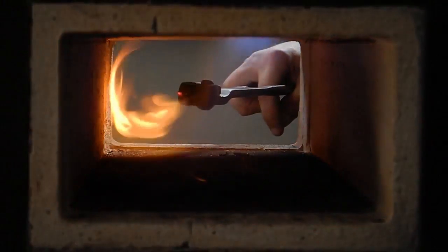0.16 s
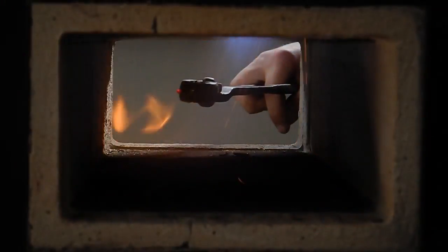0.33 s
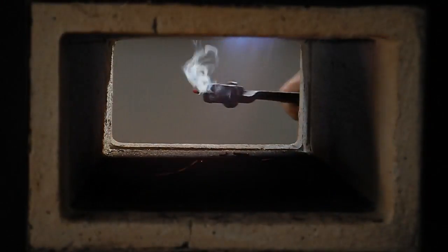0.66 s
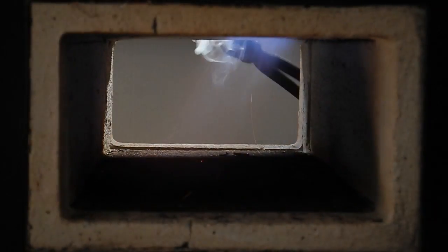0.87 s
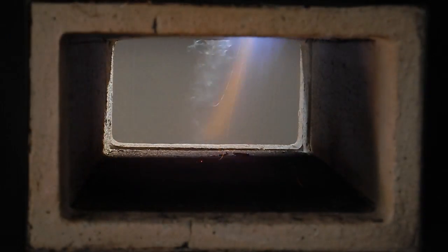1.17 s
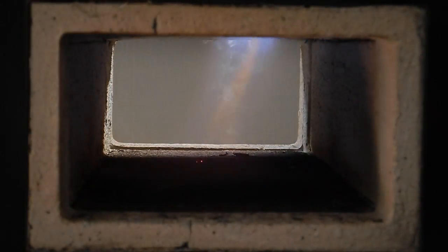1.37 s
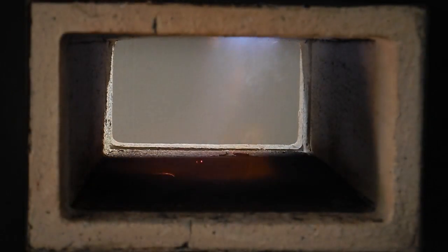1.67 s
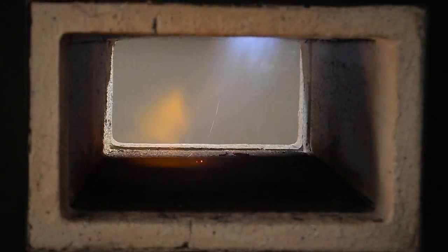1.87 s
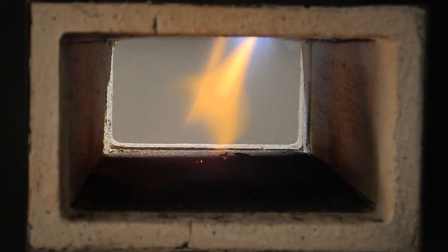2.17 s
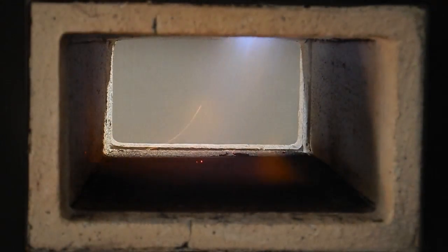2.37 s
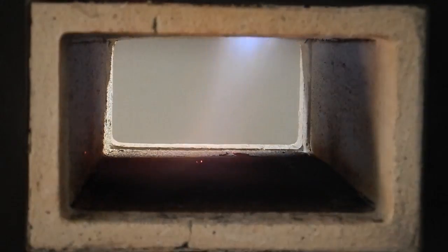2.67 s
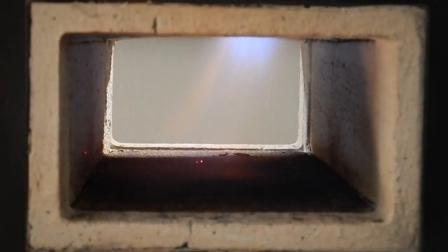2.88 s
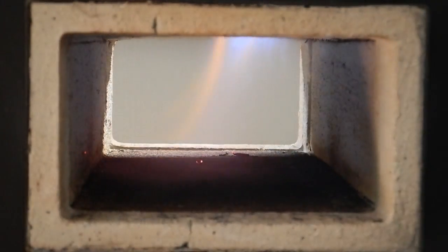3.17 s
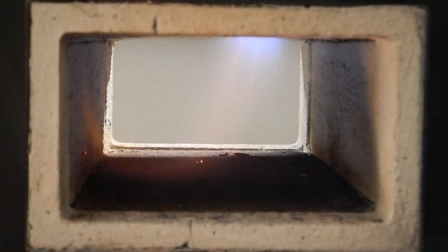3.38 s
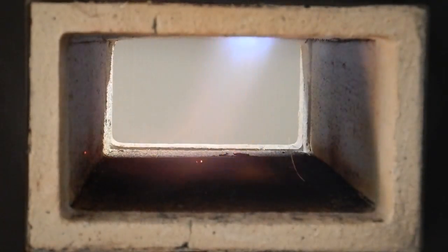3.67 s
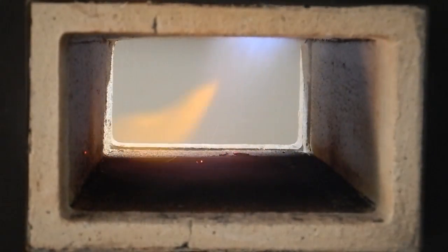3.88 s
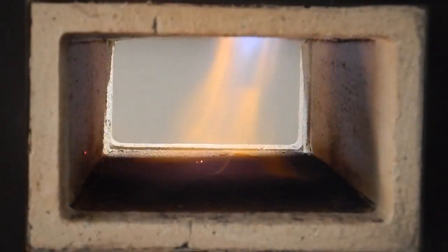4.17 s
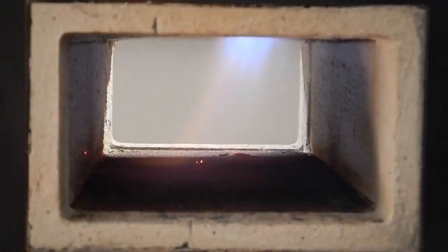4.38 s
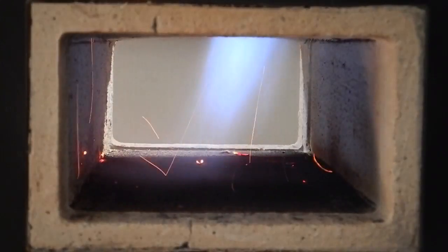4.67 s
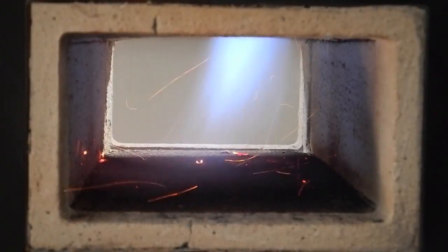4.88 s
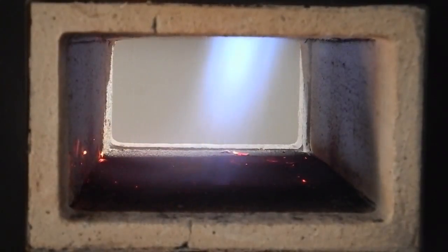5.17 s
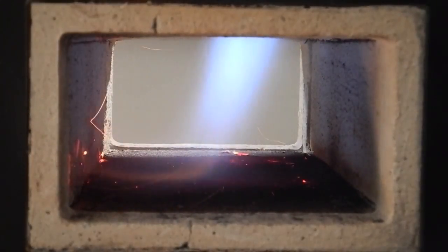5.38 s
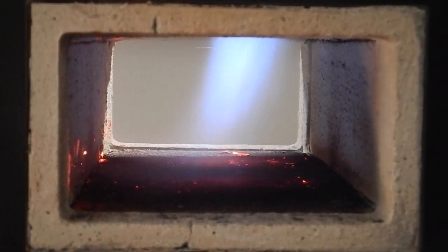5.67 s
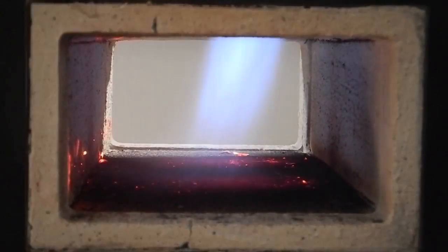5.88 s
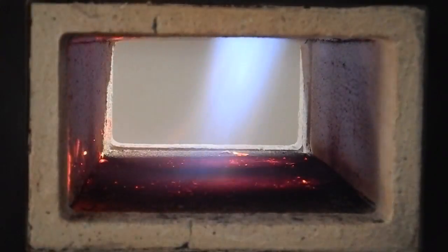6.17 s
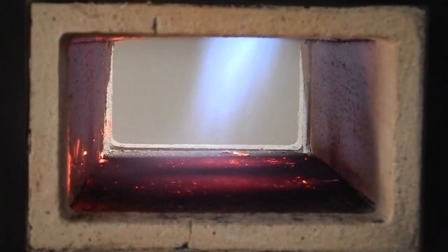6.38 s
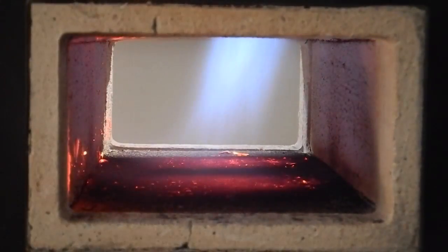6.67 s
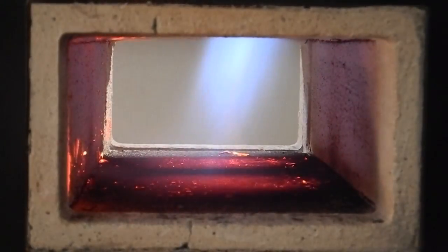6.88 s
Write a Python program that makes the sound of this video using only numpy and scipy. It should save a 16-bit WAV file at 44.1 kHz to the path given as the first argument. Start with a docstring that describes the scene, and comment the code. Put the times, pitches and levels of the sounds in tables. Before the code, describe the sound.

Close stereo pickup at the mouth of a little forge. First a rough, throaty gas roar, swelling in irregular soft thumps and dipping for moments, with a hollow chamber hum inside. Around four seconds it flips sharply into a loud, smooth, piercing hiss with a coloured, tube-like ring, slightly fluttering, its pitch creeping up almost unnoticeably. The room is very quiet beneath.

```python
"""A gas burner fires down into a small open brick forge, heard from the front opening.
First a lumpy low roar: bands of chamber-coloured noise, swelling in whumps and dipping in gutters.
At about 4 s it turns within milliseconds to a bright jet hiss, noise shaped by the resonances and
cancellations of burner tube and chamber, its pitches creeping up, over a faint workshop floor."""
import sys
import numpy as np
from scipy import signal
from scipy.fft import rfft, irfft, next_fast_len
from scipy.io import wavfile
from scipy.ndimage import uniform_filter1d, map_coordinates

SR = 44100
rng = np.random.default_rng(int(sys.argv[2]) if len(sys.argv) > 2 else 0)


def unload_wav(signal):
    """Save mono or channel-first audio to the path in sys.argv[1] as 16-bit WAV at rate SR, clipped to [-1, 1]."""
    wavfile.write(
        sys.argv[1],
        SR,
        np.round(np.clip(np.atleast_2d(signal).T, -1, 1) * 32767).astype(np.int16),
    )


N = 310023
SIZE = next_fast_len(N)
TIME_S = np.arange(N) / SR
HZ = np.maximum(np.arange(SIZE // 2 + 1) * SR / SIZE, 1)
SWITCH_S = 4.038   # middle of the change from roar to jet


def from_db(db):
    """Decibels to gain."""
    return 10 ** (np.asarray(db) / 20)


def rms_one(x):
    """Scaled to rms 1."""
    return x / np.sqrt(np.mean(x ** 2) + 1e-20)


def in_time(points):
    """A (seconds, value) table as a curve over all samples."""
    at_s, values = np.transpose(points)
    return np.interp(TIME_S, at_s, values)


def at_hz(points):
    """A (Hz, value) table read at every spectral bin, on a log axis."""
    point_hz, values = np.transpose(points)
    return np.interp(np.log(HZ), np.log(point_hz), values)


def bells(events, half_s):
    """Sum of bell-shaped bumps, each event a (seconds, height in dB)."""
    return sum(db * np.exp(-((TIME_S - at_s) / half_s) ** 2) for at_s, db in events)


def drift(corner_hz):
    """Noise at every 20th sample through a double one-pole low-pass, run in; rms 1."""
    step = 20
    pole = np.exp(-2 * np.pi * corner_hz * step / SR)
    raw = rng.standard_normal(N // step + 4002)
    slow = signal.lfilter([1], [1, -2 * pole, pole * pole], raw)[4000:]
    return np.interp(np.arange(N) / step, np.arange(len(slow)), rms_one(slow))


def bell_hz(hz, width_hz):
    """Resonance curve of height 1."""
    return 1 / (1 + (2 * (HZ - hz) / width_hz) ** 2)


def colour(tilt, tilt_db, modes, notches):
    """Gain per bin: resonances add their power to a smooth slope, notches cut into the sum."""
    power = from_db(2 * (at_hz(tilt) + tilt_db))
    for hz, width_hz, db in modes:
        power = power + from_db(2 * db) * bell_hz(hz, width_hz) ** 2
    cut_db = sum(db * bell_hz(hz, width_hz) for hz, width_hz, db in notches)
    return np.sqrt(power) * from_db(cut_db)


def stereo_noise(gain, likeness, balance):
    """Spectra of two partly alike channels of coloured noise."""
    mid, side = rfft(rng.standard_normal((2, SIZE)))
    alike = np.clip(at_hz(likeness), 0, 1)
    lean = from_db(at_hz(balance) / 2)
    mid, side = np.sqrt(1 + alike) * mid, np.sqrt(1 - alike) * side
    return gain * np.array([(mid + side) * lean, (mid - side) / lean])


def band(spectra, edges_hz, flicker_db):
    """The sound between the outer edges, in parts that each follow their own flicker; rms 1."""
    below = [1 / (1 + (HZ / hz) ** 12) for hz in edges_hz]
    total = 0
    for low, high in zip(below, below[1:]):
        part = irfft(spectra * (high - low), SIZE)[:, :N]
        total = total + part * from_db(flicker_db())
    return rms_one(total)


def steadied(x):
    """Slow chance swings of the level are partly taken out; rms 1."""
    span_s, share = 0.038, 0.61
    size = int(span_s * SR)
    power = np.mean(x ** 2, axis=0)
    for _ in range(2):
        power = uniform_filter1d(power, size=size)
    return rms_one(x / (power + 1e-9) ** (share / 2))


def roar_noise():
    """Turbulent noise coloured by the chamber's resonances, less alike left and right in the treble."""
    # Each row: frequency in Hz, slope between the resonances in relative dB before the offset.
    tilt = [(15, -69), (25, -38), (107, -26), (157, -8.5), (260, -25), (414, -5), (461, -8.5), (749, -26),
            (2590, -32.5), (4300, -39.5), (5300, -45), (7000, -44), (12000, -46.5), (13500, -49.5),
            (15800, -56.5)]
    # Chamber resonances. Each row: frequency in Hz, width in Hz, relative level in dB.
    modes = [(71, 14, -15.5), (112.6, 22.7, -7.5), (152.3, 22, -7.5), (211.4, 19, -12.5),
             (274, 11.4, -14.5), (353, 62, -6), (422.7, 19, -2), (530, 56, -15.5), (642, 15, -23),
             (1106, 150, -32.5), (1690, 79, -27), (2115, 370, -29.5), (2566, 165, -30.5), (3073, 220, -33),
             (3500, 300, -35.5), (3980, 350, -40), (4400, 370, -45.5), (6000, 850, -46.5), (8400, 600, -49),
             (9300, 2000, -46.5)]
    # Narrow gap in the airy top. Each row: frequency in Hz, width in Hz, gain in dB.
    notches = [(8820, 60, -13)]
    # Each row: frequency in Hz, left-right likeness (0 to 1).
    likeness = [(40, .9), (60, 1), (290, 0.98), (640, 0.94), (1200, 0.88), (3400, 0.92), (5000, 0.67),
                (6200, 0.55), (7300, 0.4), (9500, 0.53), (11500, 0.38), (15500, 0.34)]
    # Each row: frequency in Hz, left minus right in dB.
    balance = [(60, -0.9), (550, -2), (1850, -5), (3000, -2.5), (3900, -5), (6000, -3.6), (6700, -2),
               (8400, -0.5), (9300, -2.5), (15000, -1.5)]
    return stereo_noise(colour(tilt, -2.0, modes, notches), likeness, balance)


def roar():
    """Uneven burning: turbulent noise whose puffs shake boom, rumble, fizz and air partly together."""
    # Vigour of the flame, as its fizz before the dips. Each row: time in seconds, level in dB.
    vigour = [(0.0, -40.5), (0.08, -37.5), (0.12, -41), (0.35, -36.5), (0.53, -37.5), (0.55, -36),
              (0.56, -39), (0.64, -36.5), (0.74, -39), (0.77, -36), (0.85, -40.5), (0.95, -37),
              (1.01, -40.5), (1.35, -37), (1.38, -34), (1.4, -38.5), (1.51, -37.5), (1.59, -40.5),
              (1.68, -37.5), (1.69, -37.5), (1.96, -35.5), (2.02, -38.5), (2.52, -36), (2.54, -40),
              (2.66, -36.5), (2.74, -37), (2.76, -40.5), (3.0, -36), (3.03, -38), (3.14, -36.5), (3.2, -41),
              (3.3, -36.5), (3.33, -41), (3.6, -39), (3.65, -40), (3.73, -36.5), (3.87, -36.5),
              (3.89, -38.5), (3.93, -35.5), (4.03, -36)]
    # Pockets of gas catch and the chamber booms. Each row: time in seconds, level change in dB.
    whumps = [(0.367, 7.5), (0.533, 5), (0.675, 5), (0.748, 10.5), (0.96, 5.5), (1.113, 3.5), (1.39, 10),
              (1.865, 7.5), (1.986, 4.5), (2.169, 4), (2.247, 1.5), (2.382, 8), (2.741, 8), (2.948, 3),
              (3.119, 4.5), (3.566, 5), (3.798, 5), (3.915, 1), (3.968, -0.5), (4.017, 2.5)]
    # The flame gutters, mostly dipping the roar. Each row: time in seconds, level change in dB.
    gutters = [(0.274, -7), (0.41, -14), (0.48, -9), (0.801, -8), (1.006, -11), (1.208, -4.5), (1.336, -2),
               (1.671, -8), (1.781, -7), (2.063, -8), (2.215, -9), (2.332, -2), (2.535, 1), (2.809, -8),
               (3.056, -3), (3.203, -7), (3.286, -1), (3.341, -14), (3.44, -9), (3.519, -5), (3.622, 2),
               (3.675, -6), (3.874, -10)]
    # Low rumble before the dips. Each row: time in seconds, level in dB.
    rumble_levels = [(0.0, -36), (0.04, -36.5), (0.19, -33.5), (0.29, -30.5), (0.57, -35), (0.83, -31.5),
                     (0.93, -37), (0.95, -32), (2.13, -35), (2.39, -32.5), (2.43, -35), (2.65, -31),
                     (2.68, -38), (2.7, -31), (2.81, -35.5), (3.16, -31.5), (3.27, -41), (3.31, -30),
                     (3.39, -40.5), (3.58, -31.5), (3.66, -37), (3.75, -29.5), (3.77, -33), (4.03, -31)]
    # Airy top before the dips. Each row: time in seconds, level in dB.
    air_levels = [(0, -59), (.07, -55), (.25, -60), (.36, -54.5), (.45, -53), (.57, -55), (.65, -53.5),
                  (.8, -58), (.92, -54), (1.0, -60.5), (1.15, -57.5), (1.36, -53), (1.43, -55), (1.5, -54),
                  (1.62, -57), (1.75, -58), (1.95, -54), (2.1, -56), (2.3, -54.5), (2.44, -52.5),
                  (2.57, -57.5), (2.7, -53.5), (2.78, -58), (3.0, -54), (3.08, -55.5), (3.3, -56.5),
                  (3.37, -59), (3.6, -54.5), (3.75, -53.5), (3.88, -58), (4.03, -50.5)]
    # Swing of the throaty band. Each row: time in seconds, relative level in dB.
    body_swing = [(0, -2.5), (.8, 1), (1.5, 0.5), (2.4, -1.5), (3.3, 0), (3.8, -1), (4.0, 3.5)]

    fizz_db = in_time(vigour)
    boom_db_per_vigour_db = 0.48
    follow_db = boom_db_per_vigour_db * (fizz_db - np.mean(np.array(vigour)[:, 1]))
    dip_db = bells(gutters, half_s=0.015)
    surge_db = bells(whumps, half_s=0.012) + dip_db
    body_swing_db = in_time(body_swing)

    noise = roar_noise()
    puffs, flutter = drift(7.9), drift(93)
    boom = steadied(band(noise, [280, 385, 480],
                         lambda: 0.11 * puffs + 0.65 * flutter + 1.5 * drift(10.3)))
    # the chamber's main tone hums on
    ridge = steadied(band(noise * bell_hz(426.6, 17), [1, SR], lambda: 0.37 * drift(4.4)))
    # throaty band just under the main tone
    body = band(noise, [300, 390], lambda: body_swing_db + 1.1 * drift(6))
    # band just above the boom
    growl = band(noise, [480, 590, 737],
                 lambda: 0.26 * puffs + 2.1 * flutter + 0.41 * drift(23))
    rumble = steadied(band(noise, [1, 90, 133, 185, 280],
                           lambda: 0.5 * puffs + 1.14 * drift(13.0)))
    fizz = band(noise, [700, 950, 1300, 1850, 2350, 2850, 3300, 4200, 5000, 6000],
                lambda: 0.5 * puffs + 0.69 * flutter + 0.85 * drift(4.2) + 0.9 * drift(26))
    air = band(noise, [6000, 6600, 7300, 8000, 8800, 9700, 10600, 11600, 12700, 14000, SR],
               lambda: 0.3 * puffs + 0.8 * flutter + 1.9 * drift(7.6) + 1.3 * drift(25))

    # boom takes whumps and gutters whole, the other layers a share
    mix = from_db(-32 + follow_db + surge_db) * boom
    mix = mix + from_db(in_time(rumble_levels) + 0.12 * dip_db) * rumble
    mix = mix + from_db(-41 + 0.9 * surge_db) * ridge
    mix = mix + from_db(-42 + 0.9 * surge_db) * body
    mix = mix + from_db(-38 + follow_db + 0.14 * surge_db) * growl
    treble = from_db(fizz_db) * fizz + from_db(in_time(air_levels)) * air
    return mix + from_db(0.043 * dip_db) * treble


def warmed(spectra):
    """The air heats: the sound is read ever faster, so that all its pitches creep up."""
    rise_per_s, true_pitch_s = .002, 5.55   # share per second; when pitches pass their table values
    n = np.arange(SIZE)
    read = n + rise_per_s / (2 * SR) * (n - true_pitch_s * SR) ** 2
    doubled = 2 * irfft(spectra, 2 * SIZE)   # twice the sample rate, for clean interpolation
    return rfft([map_coordinates(x, [2 * read], order=3, mode="wrap") for x in doubled])


def jet_noise():
    """Noise coloured by resonances of tube and chamber and by paths that cancel at the opening."""
    # Each row: frequency in Hz, slope between the resonances in relative dB before the offset.
    tilt = [(15, -46), (25, -32.5), (1180, -29.5), (1430, -14.5), (1590, -24), (2330, -3.5), (2520, -14),
            (3300, -7.5), (4570, -20), (5980, -17), (8490, -3), (9460, -8), (15800, -27.5)]
    # Resonances of tube and chamber: frequency in Hz.
    modes_hz = [1020, 1460, 1940, 2110, 2730, 3030, 3240, 3660, 4185, 4640, 4845, 5000, 5450, 5645, 6235,
                6500, 6680, 6820, 7050, 7430, 8340, 8550, 9040, 10170, 10420, 10770, 11150, 13670, 14150,
                15100]
    # Their shapes, in the same order. Each row: width in Hz, relative level in dB.
    shapes = [(190, -26.5), (127, -13), (76, -13), (90, -9), (55, -8), (78, -4), (260, -13.5), (230, -19),
              (200, -12), (70, -32), (80, -14.5), (80, -21.5), (150, -19), (110, -16), (90, -15),
              (120, -12), (90, -7), (120, -15), (150, -6), (200, -8), (150, -2), (200, -1), (80, -16),
              (200, -10), (140, -13.5), (200, -13), (174, -15), (200, -20.5), (330, -23), (400, -24)]
    # Cancellations. Each row: frequency in Hz, width in Hz, gain in dB.
    notches = [(1620, 80, -3), (2000, 50, -4), (2220, 50, -3), (2550, 80, -6), (3100, 40, -13),
               (3570, 50, -9), (4010, 60, -7), (4510, 100, -6), (4740, 50, -4), (4915, 50, -8),
               (5220, 220, -4), (5800, 90, -5), (5940, 80, -7), (6120, 70, -6), (6920, 60, -6),
               (7235, 50, -5), (7550, 60, -5), (7760, 70, -3), (9150, 150, -6), (9370, 50, -4),
               (9510, 50, -4), (9980, 80, -3), (10290, 70, -6), (11280, 80, -6), (11620, 80, -4),
               (12160, 90, -5), (12490, 140, -4), (12960, 80, -5), (13460, 150, -5), (13850, 60, -5),
               (14450, 200, -2)]
    # Each row: frequency in Hz, left-right likeness (0 to 1).
    likeness = [(60, 0.8), (640, 0.73), (1100, 0.85), (1400, .997), (1900, 1), (6300, 1), (7000, 0.99),
                (8100, .985), (15000, .993)]
    # Each row: frequency in Hz, left minus right in dB.
    balance = [(60, -3.5), (700, -3), (1200, -.5), (1500, 0), (2560, 0), (2620, -2.5), (2820, -2.5),
               (2900, 0), (6400, 0), (7500, -1.6), (8500, -1.3), (10200, -0.8), (10500, -2.6),
               (15500, -3.3)]
    gain = colour(tilt, -1.9, np.column_stack([modes_hz, shapes]), notches)
    return warmed(stereo_noise(gain, likeness, balance))


def jet():
    """The fast blue flame: smooth bright noise with a slight shared flicker, over the quiet workshop."""
    # Bright hiss. Each row: time in seconds, level in dB.
    bright_levels = [(4.06, -28.5), (4.09, -30), (4.51, -30), (4.69, -28), (4.84, -29.5), (5.48, -28),
                     (5.49, -29.5), (6.94, -28.5), (7.03, -29.5)]
    sink_db_per_s = -0.56
    sink_db = sink_db_per_s * (TIME_S - SWITCH_S)
    floor_db = -59 + sink_db + bells([(4.39, 5)], half_s=0.15)   # swells once

    noise = jet_noise()
    gusts, flutter = drift(21.0), drift(93)
    bright = band(noise, [5500, 7900, 10000, 12000, SR],
                  lambda: .5 * gusts + 0.99 * flutter + 0.99 * drift(46))
    lower = band(noise, [1040, 1670, 1920, 2220, 2620, 2860, 3080, 3600, 4100, 4460, 5220, 5560],
                 lambda: 0.39 * gusts + 0.8 * flutter + 1.34 * drift(11.0))
    floor = band(noise, [152, 300, 603, 1086], lambda: 0.78 * drift(32) + 1.1 * gusts)
    deep = band(noise, [1, 150], lambda: 0.93 * drift(4.6))

    hiss = from_db(in_time(bright_levels)) * bright + from_db(-36) * lower
    workshop = from_db(floor_db) * floor + from_db(-67.5 + sink_db) * deep
    return hiss + workshop


def scene():
    """The roar fades out while the jet fades in."""
    fade_s = .016
    turn = np.clip((TIME_S - SWITCH_S) / fade_s + .5, 0, 1)
    return (1 - turn) * roar() + turn * jet()


def record(dry):
    """The input stage runs out of room and rounds the highest peaks; the top is cut steeply."""
    ceiling, cutoff_hz, ripple_db, stop_db = .27, 15760, .3, 70
    rounded = dry / (1 + (dry / ceiling) ** 4) ** .25
    low_pass = signal.ellip(18, ripple_db, stop_db, cutoff_hz, fs=SR, output="sos")
    return signal.sosfilt(low_pass, rounded)


dry = scene()
out = record(dry)
unload_wav(out)
```